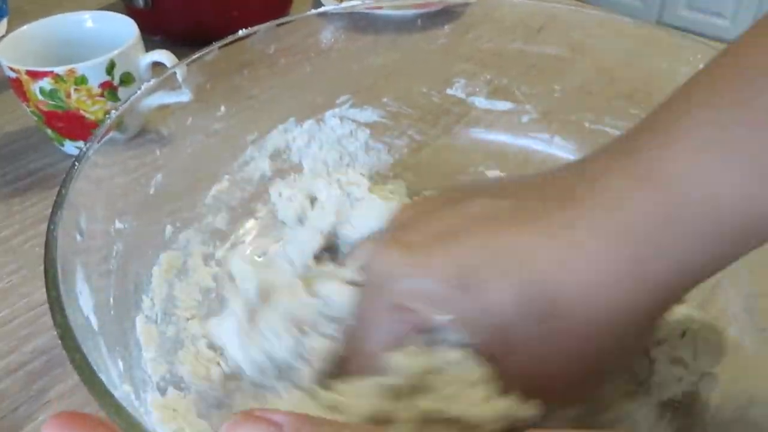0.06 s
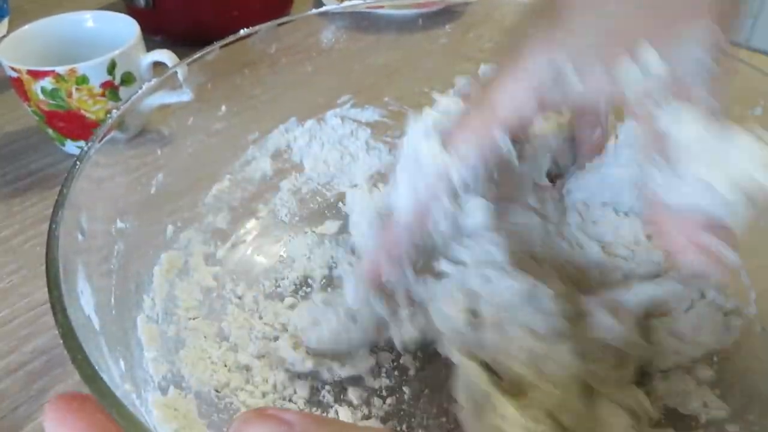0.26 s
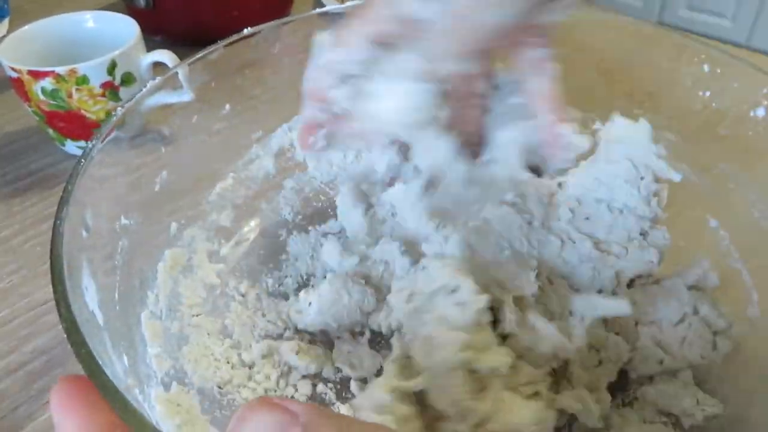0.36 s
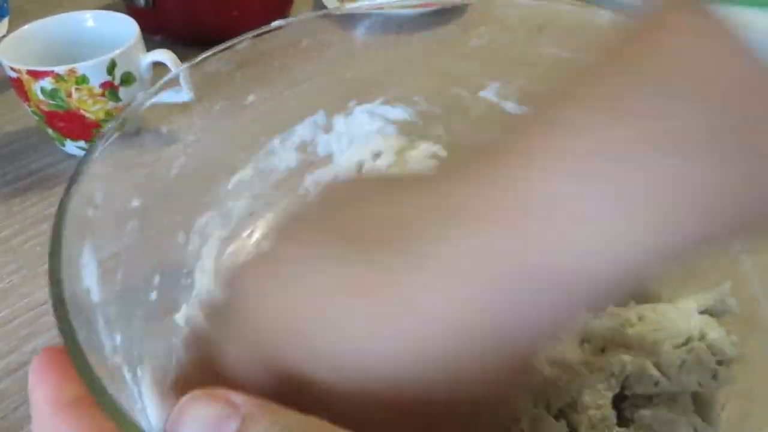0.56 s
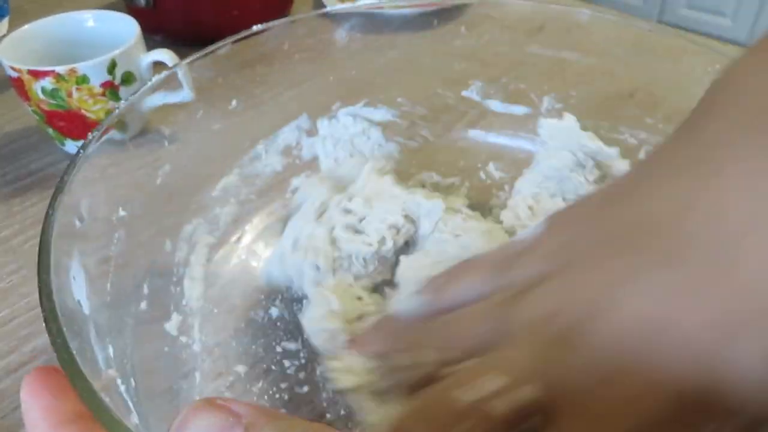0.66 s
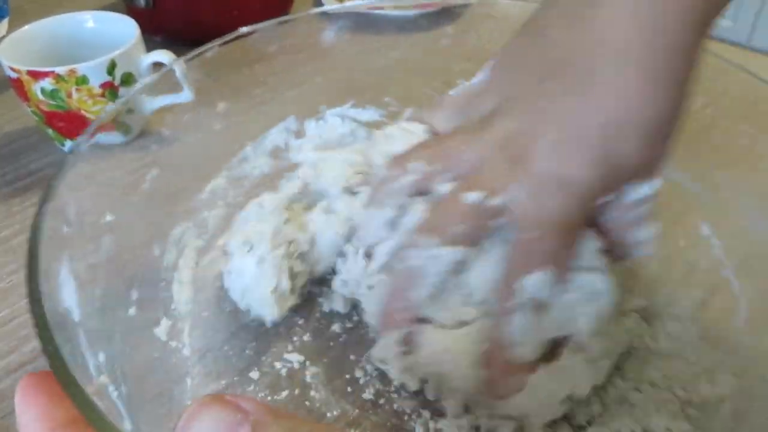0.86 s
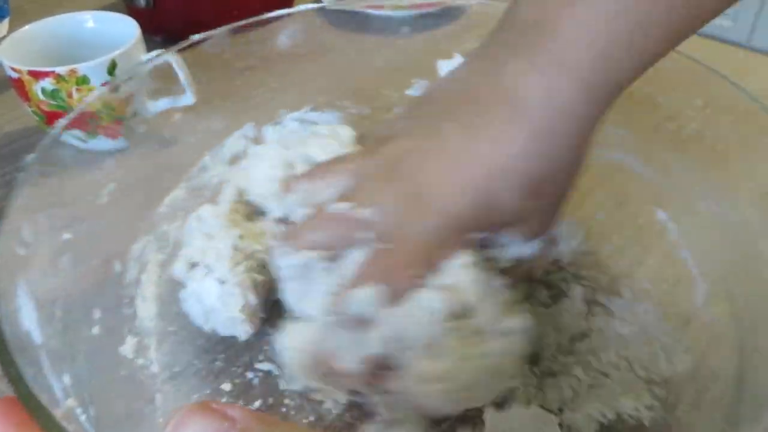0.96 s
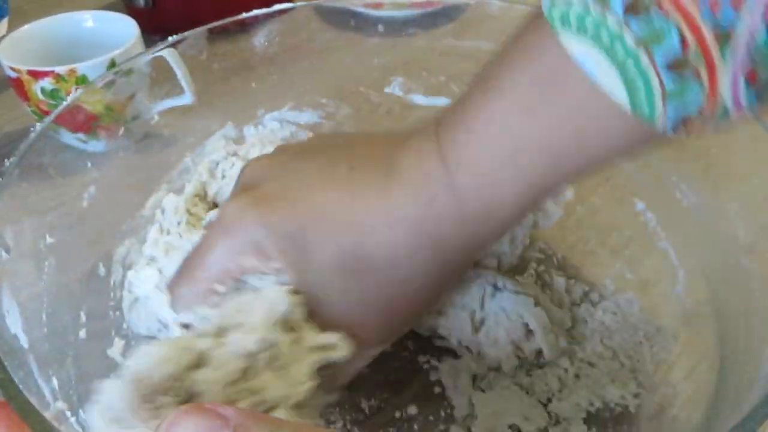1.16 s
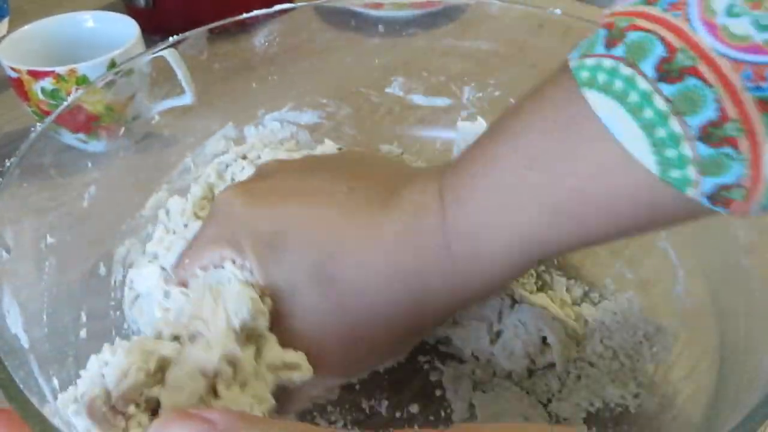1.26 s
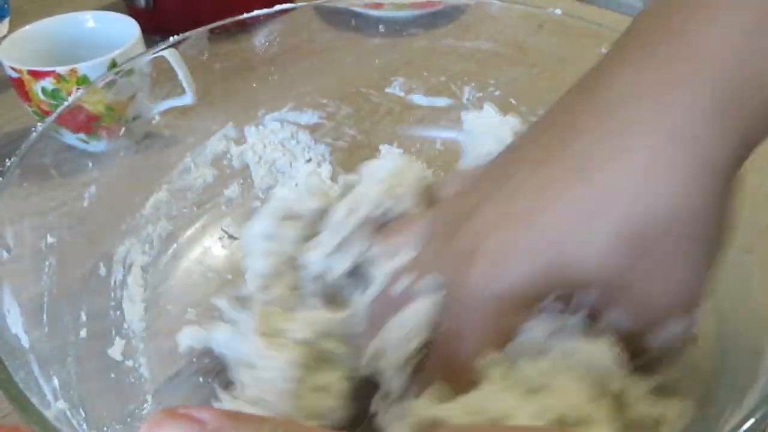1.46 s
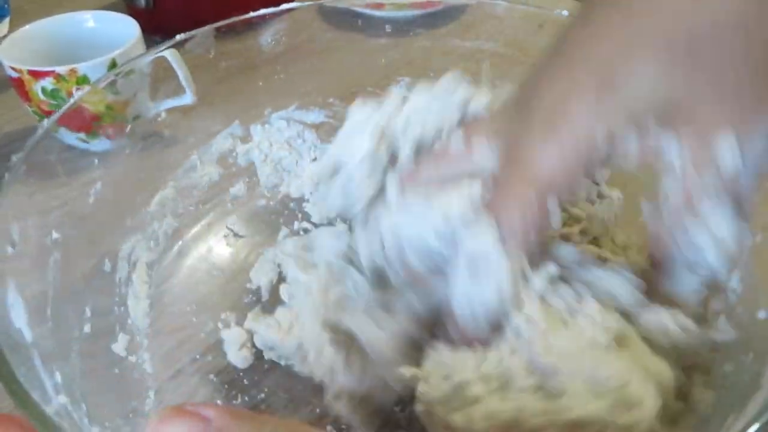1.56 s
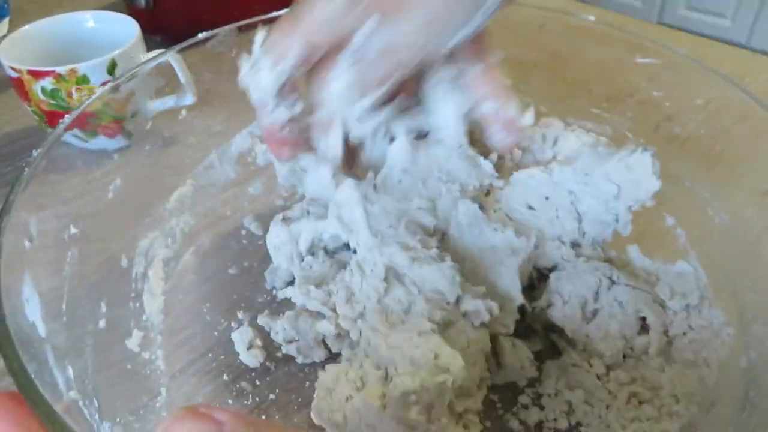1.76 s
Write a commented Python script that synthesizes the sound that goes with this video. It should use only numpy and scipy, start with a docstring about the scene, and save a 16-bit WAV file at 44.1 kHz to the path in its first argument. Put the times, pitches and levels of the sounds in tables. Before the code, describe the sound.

Close-up kneading of crumbly dough in a glass bowl: soft rubbing and wet crackles, a dull thump of the bowl on the table, more squashing, then a hard tick, in a small humming kitchen.

```python
"""A hand kneads crumbly dough in a glass bowl on a kitchen table, close by, in a small humming room.
From the start, noise bands hum, and clouds of tiny random grains make the dough rub, squash and rumble.
Short noise bursts crackle and squelch, then a push thumps the bowl on the table: pushes ring its modes.
Rubbing goes on with faintly pitched scrapes of narrow noise; the palm judders in a quick row of pushes.
Near the end one filtered impulse makes a hard tick among more bursts, and the kneading carries on."""
import sys
import numpy as np
from scipy import signal
from scipy.fft import rfft, irfft
from scipy.io import wavfile

SR = 44100
rng = np.random.default_rng(int(sys.argv[2]) if len(sys.argv) > 2 else 0)


def master(y):
    """Save y as 16-bit WAV."""
    cut = np.clip(np.atleast_2d(y).T, -1, 1)
    pcm = np.round(cut * 32767)  # scale
    wavfile.write(sys.argv[1], SR, pcm.astype(np.int16))


N = 79380  # samples, 1.8 s
T, HZ = np.arange(N) / SR, np.fft.rfftfreq(N, 1 / SR)  # time in s, pitch in Hz

# Tone of the short bursts and of the loose crumbs: pitch_hz [Hz], relative level_db [dB]
BURST_COLOUR = [(100, -12), (500, -15), (1000, 0), (1700, 5), (2100, 5.5), (3000, 2.5), (4300, 0.5),
                (6000, -5), (8000, -7), (11000, -8), (16000, -14)]


def amp(db):
    """Turns decibels into gain."""
    return 10 ** (np.asarray(db) / 20)


def unit(x):
    """Scales a sound to an average (rms) level of 1."""
    return x / np.sqrt(np.mean(x ** 2) + 1e-20)


def read(points, hz):
    """Reads a table between its points, along a logarithmic pitch axis."""
    point_hz, value = np.transpose(points)
    return np.interp(np.log(hz + 1), np.log(point_hz), value)


def level(points):
    """Draws a gain over time through points of (time in s, level in dB)."""
    return amp(np.interp(T, *np.transpose(points)))


def add(mix, start_s, sound):
    """Mixes a sound in at its start time, cutting whatever runs past the end."""
    start = max(round(start_s * SR), 0)
    part = mix[..., start:][..., :sound.shape[-1]]
    part += sound[..., :part.shape[-1]]


def colour(x, gain_db):
    """Filters to the given gain at each pitch, with no sound ahead of its cause (minimum phase)."""
    log_gain = np.log(amp(gain_db))
    mirrored = np.r_[log_gain, log_gain[-2:0:-1]]
    phase = -signal.hilbert(mirrored).imag[:len(HZ)]
    return irfft(rfft(x) * np.exp(log_gain + 1j * phase), N)


def stereo(pair):
    """Turns two unrelated signals into left and right: alike in the bass, wider in the treble."""
    # How alike left and right are: pitch_hz [Hz], correlation [0 to 1]
    likeness = [(50, 1), (150, 1), (350, 0.98), (700, 0.95), (1400, 0.85), (2800, 0.77), (5600, 0.49),
                (10000, 0.53), (15000, 0.11)]
    same = np.clip(read(likeness, HZ), 0, 1)
    mid, side = rfft(pair) * np.sqrt([(1 + same) / 2, (1 - same) / 2])
    return irfft([mid + side, mid - side], N)


def room(x):
    """Makes the kitchen's tail: sparse random reflections, each pitch band dying at its own speed."""
    # Time for the tail to fall by 60 dB: pitch_hz [Hz], t60_s [s]
    room_t60 = [(60, 0.53), (250, 0.19), (1000, 0.79), (4000, 0.26), (15000, 0.42)]
    hit = rng.random((2, N)) < 4000 / SR  # about 4000 reflections per s
    taps = rng.standard_normal((2, N)) * hit * (T > .004)
    hz, t, bands = signal.stft(taps, SR, nperseg=256)
    decay = amp(-60 * t / read(room_t60, hz)[:, None])
    tail = signal.istft(bands * decay, SR, nperseg=256)[1]
    tail = tail / np.linalg.norm(tail[0])
    return stereo(signal.fftconvolve(x[None], tail, axes=1)[:, :N])


def tone_lift():
    """Gives the lift in dB at each pitch for the grains, short bursts and tick."""
    # Tone peaks: pitch_hz [Hz], width_hz [Hz], lift_db [dB]
    tone_peaks = [(485, 36, 4.5), (686, 66, 5), (804, 55, 4), (1015, 54, 4.5), (1312, 36, 3),
                  (1620, 23, 5.5), (1764, 29, 5), (2315, 76, 5.5), (2696, 51, 5), (2976, 72, 6),
                  (3350, 71, 4), (3770, 90, 4), (4840, 33, 4), (6120, 110, 5.5), (7470, 110, 5.5)]
    return sum(lift_db / (1 + ((HZ - hz) / width) ** 2) for hz, width, lift_db in tone_peaks)


def grains(per_s, spread_db, spectrum):
    """Makes countless tiny slips and breaks of uneven size, at rms 1."""
    size = amp(spread_db * np.minimum(rng.exponential(1, (2, N)), 4.5))
    size = size * rng.choice([-1, 1], (2, N))
    hits = size * (rng.random((2, N)) < per_s / SR)
    return unit(stereo(colour(hits, read(spectrum, HZ) + tone_lift())))


def background():
    """Fills the room with steady noise and a few narrow bands of noise that hum."""
    # Tone of the room noise: pitch_hz [Hz], relative level_db [dB per Hz]
    floor_colour = [(20, 7), (50, -4.5), (80, -6.5), (125, 1.5), (170, -3), (280, -9.5), (350, -7.5),
                    (700, -17.5), (1100, -18.5), (2000, -27.5), (4000, -30), (8000, -38), (14000, -45),
                    (16000, -69)]
    # Humming bands: pitch_hz [Hz], width_hz [Hz], level_db [dB rms]
    hum_bands = [(226.7, 25, -37.5), (286, 18.3, -43.5), (683, 21, -64.5), (800, 13, -57)]
    floor_db = -35.5  # dB rms

    def noise(gain):
        """Shapes random hiss by a gain at each pitch, at rms 1."""
        hiss = rfft(rng.standard_normal((2, N)))
        return unit(stereo(irfft(hiss * gain, N)))

    hums = sum(amp(db) * noise(1 / (1 + ((HZ - hz) / width) ** 2)) for hz, width, db in hum_bands)
    return amp(floor_db) * noise(amp(read(floor_colour, HZ))) + hums


def presses():
    """Makes lumps give way under the hand: low grains swell and fade as the bowl and table shake."""
    # Presses: peak_s [s], level_db [dB], rise_s [s], fall_s [s]
    press_rows = [(.14, -37, 0.032, 0.05), (.31, -35, 0.052, 0.054), (.49, -27, 0.023, 0.068),
                  (0.601, -29.5, 0.03, 0.034), (.68, -39, .03, 0.076), (.83, -36.5, 0.087, 0.1),
                  (.975, -34.5, 0.028, 0.048), (1.09, -32, 0.044, 0.025), (1.452, -33, 0.035, 0.065),
                  (1.72, -33, 0.04, 0.03)]
    # Tone of the rumble: pitch_hz [Hz], relative level_db [dB]
    press_colour = [(20, -23), (45, -11), (66, 1), (90, -5.5), (130, -1), (175, -4.5), (230, -1),
                    (290, -6.5), (360, -18.5), (1000, -39), (16000, -84)]
    effort = np.zeros(N)
    for peak_s, db, rise_s, fall_s in press_rows:
        distance = np.maximum((peak_s - T) / rise_s, (T - peak_s) / fall_s)
        effort += amp(db) * np.exp(-distance)
    return effort * grains(900, 1.5, press_colour)  # grains per s, spread in dB


def judder():
    """Makes the palm stick and slip on the glass: soft, uneven pushes that swell and fade."""
    peak_s, half_s, contact_s = 1.016, .012, .004
    slips_per_s, peak_db, uneven = 133.6, -23, .05  # uneven: share of the spacing
    late_s = (np.arange(-8, 9) + uneven * rng.standard_normal(17)) / slips_per_s
    fade_db = 10 * np.log10(1 + (late_s / half_s) ** 4)
    return [(peak_s + late, peak_db - fade, contact_s) for late, fade in zip(late_s, fade_db)]


def bowl():
    """Rings the bowl and table with smooth pushes; the shorter the contact, the brighter the knock."""
    # Modes of the loaded bowl and the table under it: pitch_hz [Hz], level_db [dB], t60_s [s]
    modes = [(66.7, -10, 0.22), (119.4, 6, 0.048), (226, 1, 0.12), (285, -2, 0.074), (400, -2, 0.04),
             (490, -8, 0.14), (710, -15, 0.057), (800, -19, 0.072), (985, -13, 0.11), (1027, -9, .065),
             (1300, -17, .06), (1660, -12, .065), (1830, -12, .065), (2220, -10, .05)]
    # Blows of the bowl on the table: start_s [s], level_db [dB], contact_s [s]
    blows = [(.4385, -24.5, .0012), (0.445, -5.5, 0.0038), (.4695, -26, .0032), (0.486, -16, 0.0059),
             (.5603, -24, .0007), (.6525, -35, 0.00036), (.978, -31.5, 0.0047), (1.0415, -30, .003),
             (1.0725, -31, .003)]
    wall_hz, wall_build_s = 350, .0015  # higher modes are the glass wall and take a moment to build
    room_db = -12
    force = np.zeros(N)
    for start_s, db, contact_s in list(blows) + judder():
        t = np.arange(0, contact_s, 1 / SR)
        push = np.sin(np.pi * t / contact_s) ** 2
        add(force, start_s, amp(db) * push / push.sum())
    build = 1 - np.exp(-T / wall_build_s)
    ring = np.zeros(N)
    for hz, db, t60_s in modes:
        mode = amp(db - 60 * T / t60_s) * np.cos(2 * np.pi * hz * T)
        ring += mode * (build if hz > wall_hz else 1)
    knocks = signal.fftconvolve(force, ring)[:N]
    return knocks + amp(room_db) * room(knocks)


def tick():
    """Makes one hard contact on the bowl, perhaps a fingernail: a single filtered impulse."""
    # Tone of the tick: pitch_hz [Hz], relative level_db [dB]
    tick_colour = [(100, -24), (400, -4), (800, 8.5), (1100, 7.5), (1500, -7), (2200, -3.5), (3000, 0.5),
                   (4100, -9), (5200, 3.5), (6300, -10), (7800, 2.5), (9000, -1.5), (10200, -11),
                   (11500, 0), (12600, -12), (14200, -9), (16000, -22)]
    start_s, level_db, room_db = 1.5334, -2, -14.5
    hit = colour(signal.unit_impulse(N), read(tick_colour, HZ) + tone_lift())
    contact = np.zeros(N)
    add(contact, start_s, amp(level_db) * hit)
    return contact + amp(room_db) * room(contact)


def scrapes():
    """Drags fingers over the glass: friction feeds one resonance, heard as a narrow band of noise."""
    # Scrapes: peak_s [s], half_length_s [s], level_db [dB], pitch_hz [Hz] (shifts with where the dough lies)
    scrape_rows = [(.1, 0.2, -52, 1950), (.3, 0.16, -52.5, 1873), (0.65, 0.012, -40.5, 1675),
                   (.72, .06, -47.5, 1690), (1.4, .03, -51, 1670), (1.69, 0.08, -48.5, 1846)]
    width_hz = 110
    out = np.zeros((2, N))
    for peak_s, half_s, db, hz in scrape_rows:
        hiss = rfft(rng.standard_normal((2, N)))
        band = irfft(hiss / (1 + ((HZ - hz) / width_hz) ** 2), N)
        swell = np.exp(-((T - peak_s) / half_s) ** 2)
        out += amp(db) * swell * unit(band)
    return stereo(out)


def crackles_and_squelches():
    """Makes crackles of crumbs and dull squelches of dough: short fading noise bursts in the room."""
    # Bursts: start_s [s], level_db [dB], decay_s [s to 1/e], brightness [dB per octave]
    bursts = [(0.2053, -11.5, 0.0099, -.5), (.2125, -15.5, 0.0037, 1.5), (.4385, -19, 0.0061, -16),
              (.556, -14.5, 0.0057, -2), (0.5621, -8.5, 0.0075, -2), (0.64, -21, 0.0044, -1),
              (0.6516, -13, 0.0042, -5), (.689, -17, .004, -5), (1.03, -20, .008, -2),
              (1.055, -13, .008, -2), (1.15, -21, .006, -5.5), (1.268, -30, 0.0033, 5),
              (1.395, -23, .003, -10.5), (1.455, -19, .01, -2), (1.529, -12.5, 0.0052, 3.5),
              (1.5356, -8, 0.0019, -2), (1.724, -27, 0.0044, 2.5)]
    room_db = -4
    out = np.zeros((2, N))
    body_db = read(BURST_COLOUR, HZ) + tone_lift()
    octaves = np.log2(np.maximum(HZ, 700) / 2500)  # the tilt pivots at 2500 Hz and is flat below 700 Hz
    for start_s, db, decay_s, tilt_db in bursts:
        burst = rng.standard_normal((2, N)) * np.exp(-T / decay_s)
        burst /= np.linalg.norm(burst, axis=1, keepdims=True)
        add(out, start_s, amp(db) * colour(burst, body_db + tilt_db * octaves))
    return stereo(out) + amp(room_db) * room(out[0])


def dough():
    """Rubs fine floury grains and separate loose crumbs over the glass, with duller squashing."""
    # Dough sliding over the glass: time_s [s], level_db [dB]
    slide_level = [(0, -59), (.18, -50), (.28, -48.5), (.35, -50.5), (.41, -61), (.48, -61), (.56, -42),
                   (.68, -54), (.8, -47.5), (.9, -41), (.98, -52), (1.06, -50.5), (1.2, -51), (1.39, -69),
                   (1.47, -46.5), (1.56, -50), (1.65, -49), (1.8, -69)]
    # Tone of the sliding: pitch_hz [Hz], relative level_db [dB]
    slide_colour = [(300, 14), (1200, 5.5), (2800, -3), (4500, 1), (6300, -5), (7600, -2), (10000, -7),
                    (14000, -3), (16000, -9)]
    # Dough squashing between the fingers: time_s [s], level_db [dB]
    squash_level = [(0, -43.5), (.11, -37.5), (.17, -41.5), (.33, -36.5), (.41, -43), (.47, -37.5),
                    (.53, -55), (.59, -41), (.7, -39), (.85, -45), (.98, -45), (1.06, -39.5), (1.14, -46),
                    (1.34, -53), (1.4, -41), (1.49, -42.5), (1.57, -44), (1.8, -41)]
    # Tone of the squashing: pitch_hz [Hz], relative level_db [dB]
    squash_colour = [(100, -13.5), (300, -5), (450, 2), (700, 0), (1200, -13.5), (1700, -10.5),
                     (2400, -18.5), (4000, -24.5), (8000, -35), (16000, -28)]
    crumb_db = -7  # against the rubbing
    # Each cloud of grains: how many per s, spread of sizes in dB, tone
    rubbing = grains(5000, 2.5, slide_colour)
    crumbs = amp(crumb_db) * grains(130, -1, BURST_COLOUR)
    squashing = grains(1400, 2.5, squash_colour)
    return level(slide_level) * (rubbing + crumbs) + level(squash_level) * squashing


def scene():
    """Adds all the sources together, from the background to the dough."""
    knocking = bowl() + tick()
    return background() + presses() + knocking + scrapes() + crackles_and_squelches() + dough()


def record(dry):
    """Thins the bass below 35 Hz and cuts off the treble above the top edge."""
    edge_hz = 15600
    high_pass = signal.butter(2, 35, "high", fs=SR, output="sos")
    thinned = signal.sosfilt(high_pass, dry)
    low_pass = signal.firwin(511, edge_hz, window=("kaiser", 9), fs=SR)
    return signal.oaconvolve(thinned, low_pass[None], "same")


dry = scene()
out = record(dry)
master(out)
```